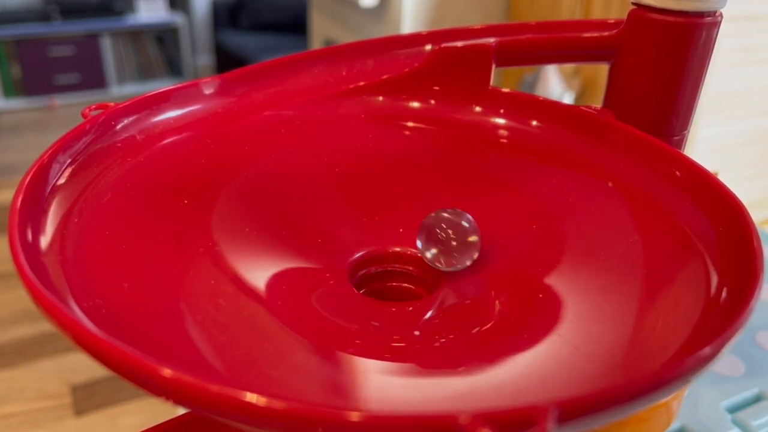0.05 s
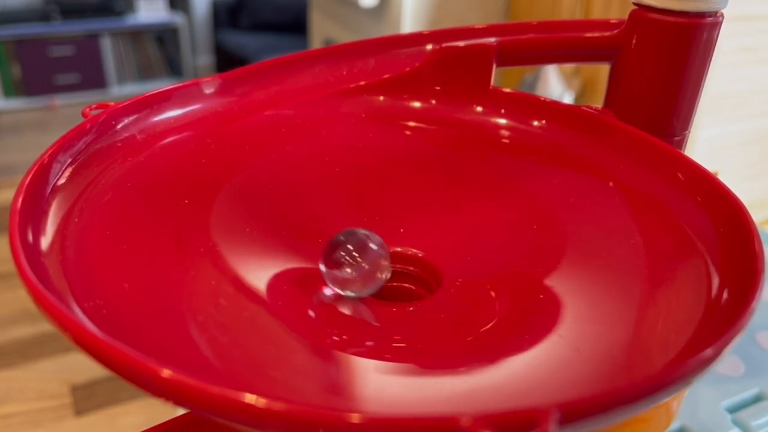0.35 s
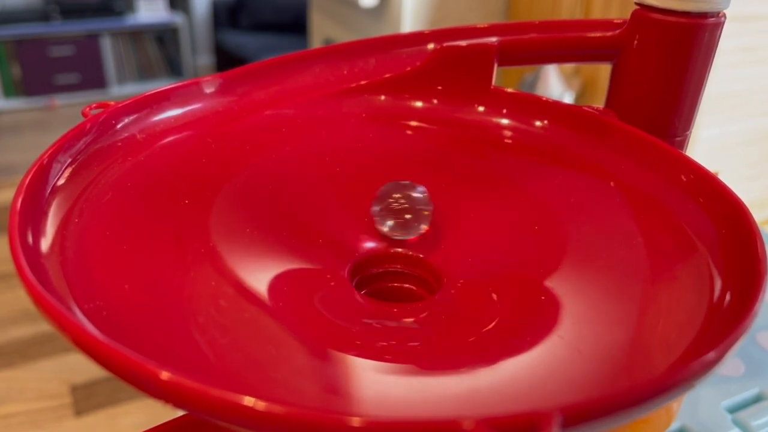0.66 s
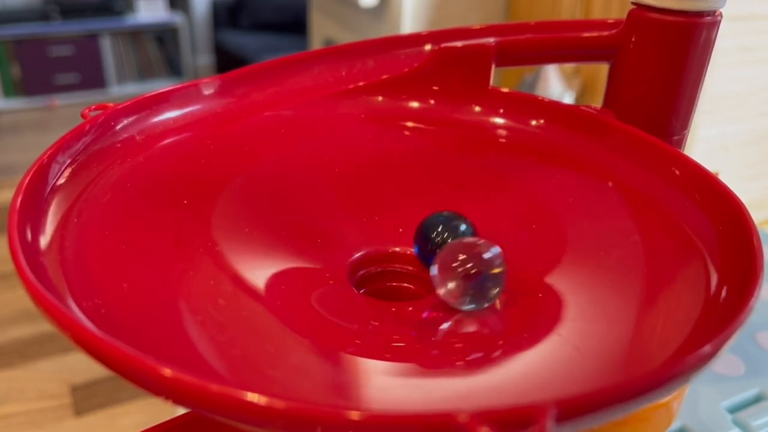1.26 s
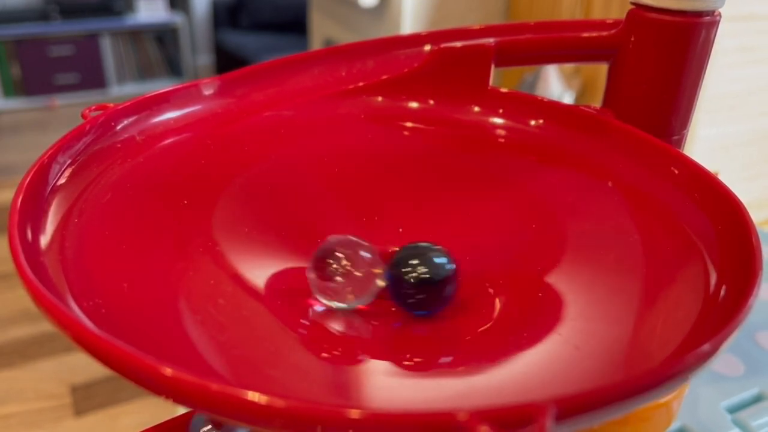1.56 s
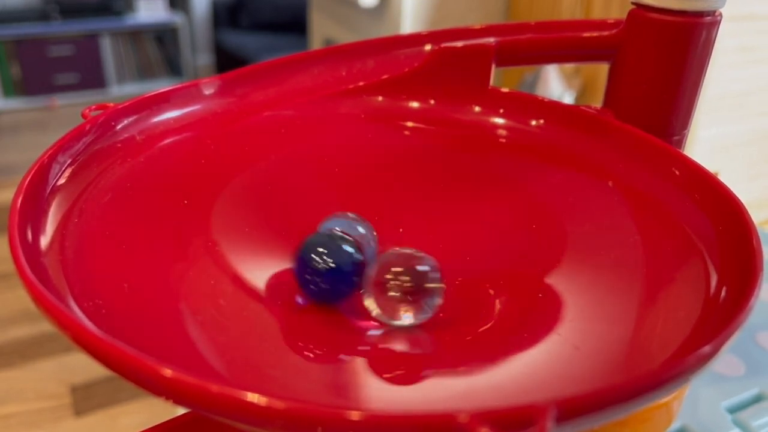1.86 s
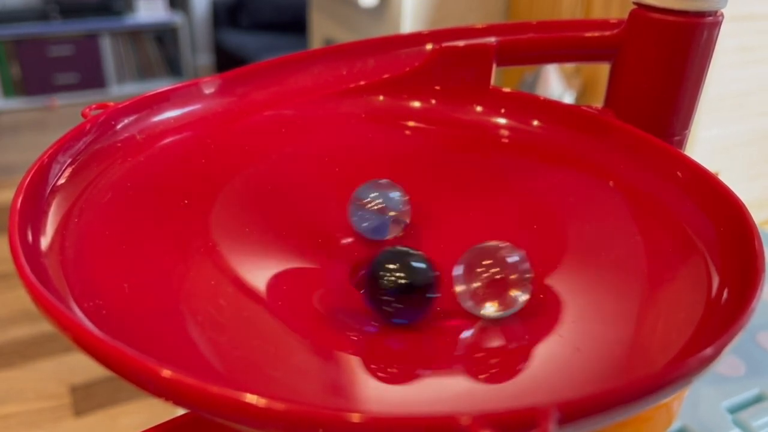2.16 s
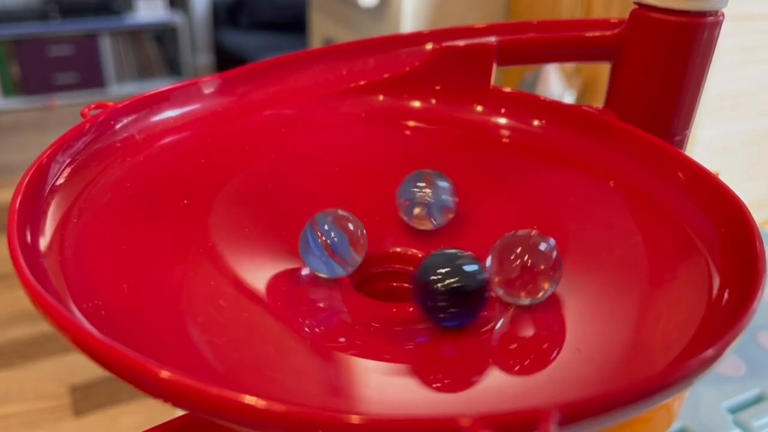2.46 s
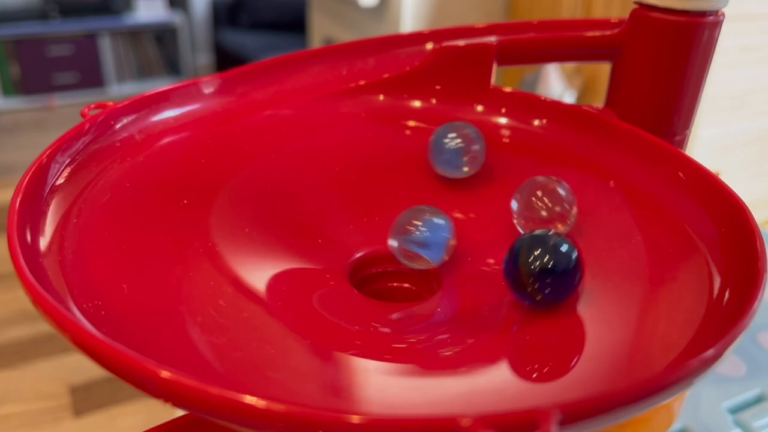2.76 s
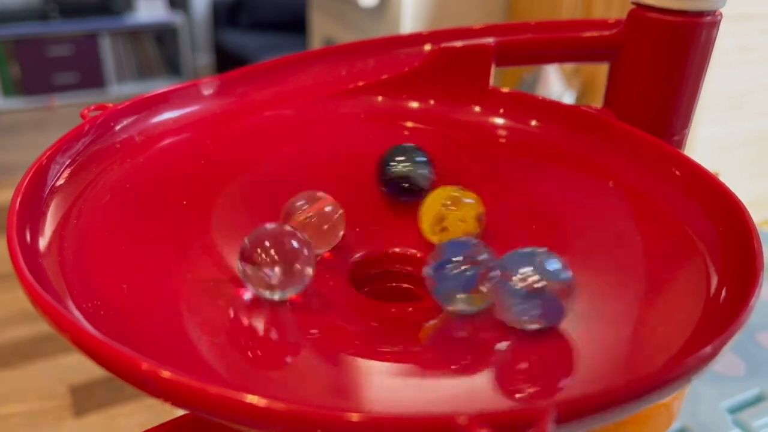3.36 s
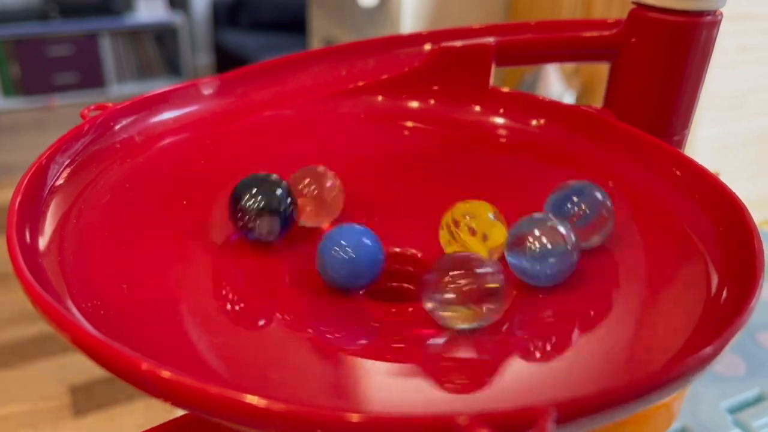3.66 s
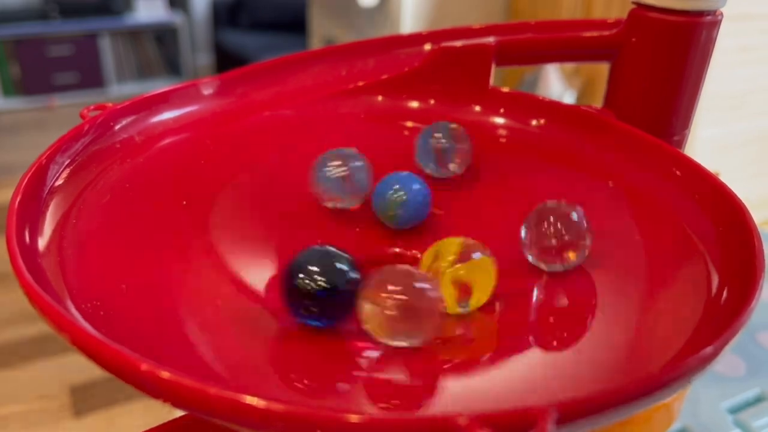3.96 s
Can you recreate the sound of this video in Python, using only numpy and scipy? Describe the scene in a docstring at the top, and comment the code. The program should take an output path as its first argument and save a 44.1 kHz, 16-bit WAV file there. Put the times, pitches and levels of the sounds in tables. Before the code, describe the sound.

Glass marbles roll in a plastic funnel, close by and played backwards. A grainy hiss with hollow ringing and faint rumble starts softly and swells near 0.4 and 2.1 seconds. Clicks and clinks come throughout, each rising briefly and stopping dead, with sharper ones around 0.8, 1.0 and 1.4 seconds. The knocks crowd together from 2.8 to 3.3 seconds, and slightly louder rolling continues until 4 seconds.

```python
"""Glass marbles roll and clack in the plastic funnel of a marble run, close by in a quiet room.
Rolling is a dense patter of tiny contacts that makes the bowl hiss and ring and the frame rumble.
The marbles also clink, rub together and drop onto the plastic. The sound is played backwards,
so every knock swells briefly and stops dead. Times in the tables are playback times."""
import sys
import numpy as np
from scipy import signal
from scipy.fft import rfft, irfft
from scipy.io import wavfile

SR = 44100
rng = np.random.default_rng(int(sys.argv[2]) if len(sys.argv) > 2 else 0)


def bounce(signal):
    """Save signal as a 16-bit WAV file at the path given by the first command-line argument."""
    frames = np.transpose(np.atleast_2d(signal))
    limited = np.clip(frames, -1, 1)
    pcm = np.round(limited * 32767).astype(np.int16)
    wavfile.write(sys.argv[1], SR, pcm)


N = 176400

# how far each pitch leans to the left: f/Hz, left minus right/dB
BALANCE = [(200, 0.5), (3000, 1.5), (5500, 3.5), (10000, 4), (13500, 4.5), (15600, 3)]
# noisy parts of a knock: lowest f/Hz, highest f/Hz, t60/s (time to fade by 60 dB), relative level/dB
BODY, CRACK, SNAP = (2890, 4070, 0.02, 1), (4000, 9160, 0.012, 7.4), (9500, 14900, 0.011, 2.5)
TYPICAL_ROLL_DB, TYPICAL_RING_DB = -22.5, -41.5
KNOCK_SAMPLES, PING_T60_S = 6144, 0.013
AGE = np.arange(KNOCK_SAMPLES) / SR   # seconds since a knock began


def from_db(db):
    """Turn decibels into a number to multiply by."""
    return 10 ** (np.asarray(db) / 20)


def rms_one(x):
    """Scale a signal so that its average power is 1."""
    return x / np.sqrt(np.mean(x ** 2) + 1e-20)


def at_hz(points, hz):
    """Read a table between its rows, giving each octave equal room."""
    table_hz, values = np.transpose(points)
    return np.interp(np.log(hz), np.log(table_hz), values)


def playback_s():
    """The time at which each sample is heard once the scene is reversed."""
    return np.arange(N)[::-1] / SR


def in_time(rows):
    """Turn each table column after the time into a curve with one value per sample."""
    s, *columns = np.transpose(rows)
    return [np.interp(playback_s(), s, column) for column in columns]


def place(events):
    """Mix (playback time, sound) pairs into one stereo track."""
    out = np.zeros((2, N))
    for s, sound in events:
        i = int(np.clip(N - s * SR, 0, N - 1))
        out[:, i:i + sound.shape[1]] += sound[:, :N - i]
    return out


def drift(rate_hz):
    """A smooth random curve that wanders about 1 either side of zero."""
    step, settle = 40, 2000   # samples per point; points skipped while the filter settles
    r = np.exp(-2 * np.pi * rate_hz * step / SR)
    slow = signal.lfilter([1], [1, -2 * r, r * r], rng.standard_normal(N // step + settle + 2))[settle:]
    return np.interp(np.arange(N) / step, np.arange(len(slow)), rms_one(slow))


def band(x, low, high):
    """Keep the frequencies between low and high."""
    return signal.sosfilt(signal.butter(2, [low, high], "band", fs=SR, output="sos"), x)


def panned(x, db):
    """Lean a stereo sound to the left (right if db is negative), keeping its power."""
    return x * rms_one(from_db(np.array([[db], [-db]]) / 2))


def stereo_noise(hz, size):
    """White noise that is as alike in both ears as the bowl's sound is at this frequency."""
    # how alike the two sides are: f/Hz, correlation (1 = the same)
    likeness = [(220, 0.96), (700, 0.91), (1500, 0.0098), (3000, 0.21), (14000, 0.54)]
    alike = at_hz(likeness, hz)
    mid, side = rng.standard_normal((2, size))
    return np.sqrt(1 + alike) * mid + np.sqrt(1 - alike) * side * [[1], [-1]]


def noise_bands(spectrum, edges):
    """Give the centre and the stereo noise of each band; the spectrum shares out the power."""
    centres = np.sqrt(edges[1:] * edges[:-1])
    power = from_db(at_hz(spectrum, centres)) ** 2 * np.diff(edges)
    for low, high, hz, share in zip(edges, edges[1:], centres, power / power.sum()):
        noise = rms_one(band(stereo_noise(hz, N), low, high))
        yield hz, np.sqrt(share) * panned(noise, at_hz(BALANCE, hz))


def narrow_noise(hz, width_hz):
    """Noise in a band so narrow that it has a pitch, which may glide."""
    white = stereo_noise(np.mean(hz), N) + 1j * stereo_noise(np.mean(hz), N)
    slow = signal.sosfilt(signal.butter(2, width_hz / 2, fs=SR, output="sos"), white)
    phase = 2 * np.pi * np.cumsum(hz * np.ones(N)) / SR
    return rms_one(np.real(slow * np.exp(1j * phase)))


def burst(low, high, t60, db):
    """A hit sets many close tones ringing at once: a band of noise that dies away."""
    noise = band(stereo_noise(np.sqrt(low * high), 2 * KNOCK_SAMPLES), low, high)[:, KNOCK_SAMPLES:]
    decay = from_db(np.maximum(-60 * AGE / t60, -200))
    fading = band(np.sign(noise) * decay, low, high)   # using only the sign keeps the fade even
    sound = rms_one(fading) * np.sqrt(np.mean(decay ** 2))
    return panned(sound, at_hz(BALANCE, np.sqrt(low * high))) * from_db(db)


def ping(hz, t60, rise_s=0.00024, db=1.5):
    """One struck tone rises fast and rings briefly, a little out of step on the two sides."""
    phases = rng.uniform(0, 2 * np.pi) + rng.uniform(0, np.pi, (2, 1))
    wave = np.sin(2 * np.pi * hz * AGE + phases) * (1 - np.exp(-AGE / rise_s))
    return panned(wave * from_db(db - 60 * AGE / t60), at_hz(BALANCE, hz))


def echoes(x, t60, size):
    """Countless reflections smear a sound into a fading tail."""
    tail = rng.standard_normal((2, size)) * from_db(-60 * np.arange(size) / SR / t60)
    return signal.fftconvolve(x, tail / np.sqrt(np.sum(tail ** 2) / 2), axes=1)[:, :N]


def room(x):
    """The walls send back a faint, short echo."""
    return from_db(-10.5) * echoes(x, t60=0.26, size=SR // 2)


def frame_rumble(roll_db):
    """The frame of the run shakes under the rolling marbles."""
    # tone colour of the rumble: f/Hz, relative level per Hz/dB
    spectrum = [(30, -50), (65, -43), (105, -2), (135, -4.5), (200, 3.5), (360, -6.5), (480, 0),
                (850, -6.5), (2500, -6.5)]
    bands = noise_bands(spectrum, np.geomspace(22, 2500, 22))
    rumble = sum(noise * from_db(3 * drift(rate_hz=6.9)) for _, noise in bands)
    return rumble * from_db(-49 + 0.33 * (roll_db - TYPICAL_ROLL_DB))


def frame_bumps():
    """The whole frame wobbles with a soft, low bump."""
    # wobbles of the frame: t/s, relative level/dB
    bumps = [(1.27, -56), (3.44, -50), (3.579, -46.5)]
    return place((s, from_db(db) * burst(low=93, high=114, t60=0.1, db=2.5)) for s, db in bumps)


def drops():
    """A marble drops onto the plastic with a thud."""
    # landings: t/s, relative level/dB
    thuds = [(1.1131, -36.5), (1.7935, -32.5), (3.3063, -31), (3.5365, -35)]
    return place((s, from_db(db) * burst(low=430, high=3050, t60=0.027, db=6.1)) for s, db in thuds)


def rubs(hz=13650, width_hz=1900, rise_s=0.0044):
    """Spinning marbles touch and give a thin, very high hiss."""
    # glass rubbing on glass: t/s, fade time/s, relative level/dB
    touches = [(1.499, 0.038, -29), (2.203, 0.04, -21.5)]
    loudness = 0
    for s, fade_s, db in touches:
        age = np.maximum(s - playback_s(), 0)
        loudness += from_db(db) * np.minimum(age / rise_s, 1) * np.exp(-age / fade_s)
    noise = rms_one(band(stereo_noise(hz, N), hz - width_hz / 2, hz + width_hz / 2))
    return loudness * panned(noise, at_hz(BALANCE, hz))


def bowl_ring(ring_db, grain, follow=0.76, wander_db=2.5):
    """Contacts keep the bowl's own tones ringing; each dips as marbles cross spots where it is still."""
    # the bowl's own tones: f/Hz, width/Hz, relative level/dB, left minus right/dB
    tones = [(625.4, 3.7, -59, -4.5), (1521, 15, -47, 1.5), (1588, 21, -47, 7), (1670.5, 4.2, -42, 2),
             (1724, 8.1, -47.5, -12), (1876, 21, -45.5, 9), (3585, 28, -47.5, -6), (4050, 16, -48, -4)]
    out = 0
    for hz, width, db, pan_db in tones:
        push = grain * from_db(follow * (ring_db - TYPICAL_RING_DB) + wander_db * drift(rate_hz=3.5))
        r = np.exp(-np.pi * width / SR)   # share of the ringing left after one sample
        feedback = [1, -2 * r * np.cos(2 * np.pi * hz / SR), r * r]
        ring = signal.lfilter([1, 0, -1], feedback, stereo_noise(hz, N) * push)
        out += panned(ring, pan_db) * np.sqrt(1 - r * r) / 2 * from_db(db)
    return out


def hollow_tone(ring_db, hz):
    """A hollow tone glides as the marbles spiral through the bowl."""
    return panned(narrow_noise(hz, width_hz=62), db=1.5) * from_db(ring_db)


def sweeps(hz=1570, swell_s=0.018):
    """A fast marble sweeps round and makes a low ring of the bowl swell and fade."""
    # fast passes: t/s, level/dB
    passes = [(0.375, -29.5), (0.435, -25.5), (0.8, -35), (1.3, -35.5), (1.432, -25.5), (1.83, -33),
              (2.07, -31), (2.11, -31.5), (2.79, -29.5), (2.97, -34), (3.318, -31.5), (3.655, -25.5),
              (3.705, -29), (3.878, -28.5)]
    swell = sum(from_db(db) * np.exp(-((playback_s() - s) / swell_s) ** 2) for s, db in passes)
    return swell * panned(narrow_noise(hz, width_hz=95), at_hz(BALANCE, hz))


def plastic_shell(x, echo_share=0.19):
    """Waves criss-cross the thin plastic, boosting some pitches and weakening others."""
    return np.sqrt(1 - echo_share) * x + np.sqrt(echo_share) * echoes(x, t60=0.079, size=KNOCK_SAMPLES)


def contacts(per_s=2000, spread_db=4.5, fade_s=0.0021, smooth_share=0.47):
    """The grainy loudness of rolling: tiny hits of uneven size on top of a smooth part."""
    sizes = from_db(spread_db * np.minimum(rng.exponential(1, N), 4))
    hits = sizes ** 2 * (rng.random(N) < per_s / SR)
    power = signal.lfilter([1], [1, -np.exp(-1 / (fade_s * SR))], hits + 1e-18)
    return np.sqrt(smooth_share + (1 - smooth_share) * power / power.mean())


def rolling_hiss(roll_db, grain, flicker_db=2.5):
    """The contacts stir the plastic's many high tones; faster is louder, fuller and brighter."""
    # tone colour of the hiss: f/Hz, relative level per Hz/dB
    spectrum = [(300, -21.5), (900, -9), (1250, -6.5), (1600, -3.5), (2100, -0.5), (2800, 3.5), (3600, -3),
                (4500, -1), (5400, 1), (6300, -3.5), (7200, -1), (8300, 1.5), (9300, -8), (11300, -5.5),
                (13600, -6.5), (15600, 0)]
    hiss = 0
    for hz, noise in noise_bands(spectrum, np.geomspace(300, 16500, 30)):
        # bands far from 4 kHz rise and fall more with the rolling
        swing_db = 0.076 * abs(np.log2(hz / 4000)) * (roll_db - TYPICAL_ROLL_DB)
        hiss += noise * from_db(swing_db + flicker_db * drift(rate_hz=23.3))
    return hiss * grain * from_db(roll_db - 3)


def ticks(roll_db, per_s=22):
    """Small random knocks, louder when the rolling is loud."""
    crack = from_db(-5) * (burst(*BODY) + burst(*CRACK) + burst(*SNAP))
    events = []
    for when, pitch in rng.random((int(per_s * N / SR), 2)):
        i = int(when ** .7 * (N - 1))   # more of them late in playback
        tick = ping(5000 + 3400 * pitch, PING_T60_S) + crack
        events.append((i / SR, from_db(roll_db[::-1][i] - 2) * tick))
    return place(events)


def clinks():
    """Glass hits glass and leaves the plastic still: a ping with a light crack."""
    # clean clinks: t/s, relative level/dB
    hits = [(0.7514, -10), (1.416, -10), (1.932, -16), (1.95, -17), (2.868, -11.5), (2.9468, -13),
            (2.969, -16), (3.058, -15.5), (3.1592, -14), (3.7544, -14), (3.9892, -12)]
    events = []
    for s, db in hits:
        clink = ping(hz=5495, t60=0.015) + from_db(-16.5) * (burst(*CRACK) + burst(*SNAP))
        events.append((s, from_db(db) * clink))
    return place(events)


def clacks():
    """Marbles knock together and jolt the plastic: a ping, a hollow body, a crack and a high snap."""
    # knocks: t/s, relative level/dB, ping f/Hz, body gain/dB, snap gain/dB
    hits = [(0.461, -22, 6300, -13, -12), (0.554, -22, 8050, -10, -9), (0.5768, -16, 7030, -16, -10),
            (0.6278, -20.5, 6980, -5.5, -8), (0.77, -24, 5500, -7, -3), (0.958, -12, 7280, -11, -7.5),
            (0.9762, -21.5, 7440, -2, -14), (0.9884, -18, 5560, -4, -0.5), (1.1138, -20.5, 5630, 0, -12),
            (1.1957, -24.5, 6200, -4, 2.5), (1.263, -14, 7040, -27, -12), (1.3129, -17.5, 7320, -4, -15),
            (1.441, -25, 5500, 4, 3), (1.5532, -18.5, 7460, -7, -10), (1.558, -17, 8370, -7, -9),
            (1.57, -24, 4830, -1.5, -4), (1.6866, -22.5, 6220, -9.5, -3), (1.775, -18, 7060, -5, -10),
            (1.7943, -27.5, 5570, 5.5, -1), (1.825, -28, 7500, 3.5, -1), (1.9627, -24, 5530, -3.5, -8),
            (2.073, -18, 7100, -11, -6), (2.0904, -25, 7400, -4, -8), (2.2777, -31.5, 5500, 5, 1),
            (2.308, -25, 5370, 2, -4), (2.5796, -22.5, 8200, -8, -7), (2.8488, -22.5, 5040, -2.5, -6),
            (2.883, -18, 5370, -12, -11), (2.8954, -21, 5500, -5, -3), (2.9588, -18, 5560, -7, -7),
            (3.005, -17.5, 7100, -11, -14), (3.0268, -19.5, 7340, -13, -7), (3.0483, -17.5, 5770, -12, -3),
            (3.0982, -18.5, 7500, -8, -7), (3.118, -25, 8750, -3, 1.5), (3.183, -22.5, 5470, 3.5, -8),
            (3.286, -18, 7450, -14, -9), (3.3066, -17, 8350, -1.5, -4.5), (3.538, -21.5, 7200, -0.5, -4),
            (3.644, -27, 5550, -2, -7), (3.9073, -15.5, 7400, -11.5, -10), (3.921, -24.5, 5880, -6, -3)]
    events = []
    for s, db, ping_hz, body_db, snap_db in hits:
        body = burst(*BODY) + from_db(-7) * ping(hz=3570, t60=0.056)
        glass = ping(ping_hz, PING_T60_S)
        crack = from_db((body_db + snap_db) / 2) * burst(*CRACK)
        snap = from_db(snap_db) * burst(*SNAP)
        events.append((s, from_db(db) * (glass + from_db(body_db) * body + crack + snap)))
    return place(events)


def scene():
    """Marbles roll and knock in the funnel, with time still running forwards."""
    # strength of the rolling: t/s, relative level/dB
    rolling = [(0.0, -36), (0.065, -35), (0.144, -31), (0.343, -27), (0.444, -21), (0.455, -27.5),
               (0.527, -30), (0.623, -27), (0.662, -35), (0.742, -26.5), (0.806, -27.5), (0.854, -34),
               (0.982, -32), (1.054, -36), (1.109, -25), (1.229, -27.5), (1.309, -24.5), (1.317, -29.5),
               (1.397, -26.5), (1.445, -25), (1.461, -32.5), (1.509, -32.5), (1.564, -29.5), (1.58, -38),
               (1.644, -31.5), (1.812, -25.5), (1.868, -28.5), (1.99, -27.5), (2.117, -20), (2.127, -32.5),
               (2.171, -25.5), (2.235, -33.5), (2.291, -28), (2.411, -31.5), (2.578, -25), (2.714, -26.5),
               (2.794, -22.5), (2.81, -27.5), (2.969, -24), (3.137, -28), (3.181, -21.5), (3.209, -28),
               (3.312, -23), (3.352, -30.5), (3.488, -22.5), (3.51, -25), (3.751, -24.5), (3.823, -25),
               (3.886, -24.5), (3.95, -30), (3.999, -25)]
    # the bowl singing under the circling marbles: t/s, level/dB, hollow tone f/Hz
    singing = [(0.0, -54.5, 3100), (0.26, -42.5, 3080), (0.48, -35.5, 2960), (0.51, -65, 2960),
               (0.8, -47, 3050), (0.9, -53, 3100), (1.22, -42, 3110), (1.48, -40, 2970), (1.53, -67, 2970),
               (1.8, -40, 3100), (1.96, -48, 3080), (2.11, -33, 2970), (2.23, -45.5, 3080),
               (2.56, -36.5, 3000), (2.69, -44.5, 2990), (2.96, -38, 2970), (3.25, -43.5, 3030),
               (3.87, -37, 2980), (3.95, -45, 2980)]
    roll_db, = in_time(rolling)
    ring_db, tone_hz = in_time(singing)
    grain = contacts()
    bowl = bowl_ring(ring_db, grain) + hollow_tone(ring_db, tone_hz) + sweeps()
    steady = plastic_shell(rolling_hiss(roll_db, grain)) + bowl + frame_rumble(roll_db) + rubs()
    hits = clacks() + clinks() + drops() + frame_bumps() + ticks(roll_db)
    return steady + hits + room(hits)


def record(dry):
    """Play the sound backwards and cut the deepest bass and the highest treble."""
    low_cut_hz, high_cut_hz = 42, 15850
    hz = np.arange(N + 1) * SR / (2 * N)
    bass_cut = hz ** 2 / np.hypot(hz ** 2, low_cut_hz ** 2)
    treble_cut = np.clip((high_cut_hz - hz) / 150 + .5, 0, 1)
    return irfft(rfft(dry[:, ::-1], 2 * N) * bass_cut * treble_cut)[:, :N]


dry = scene()
out = record(dry)
bounce(out)
```